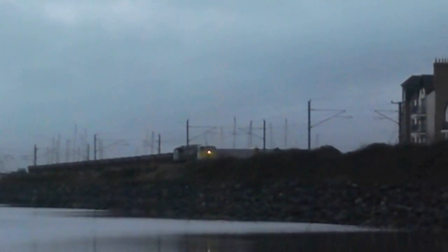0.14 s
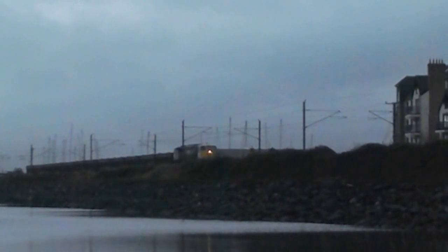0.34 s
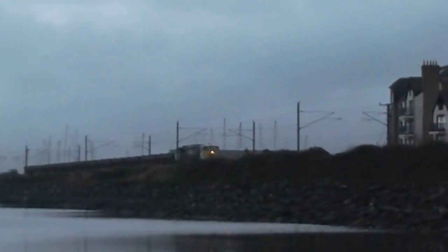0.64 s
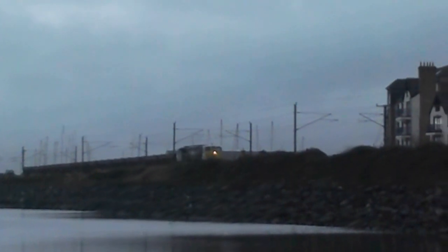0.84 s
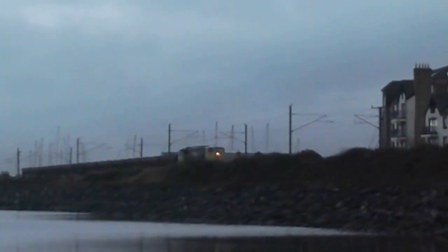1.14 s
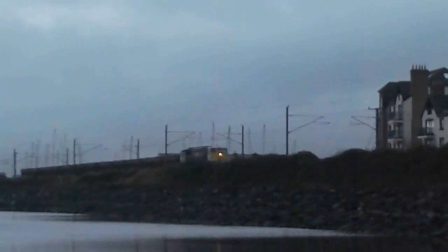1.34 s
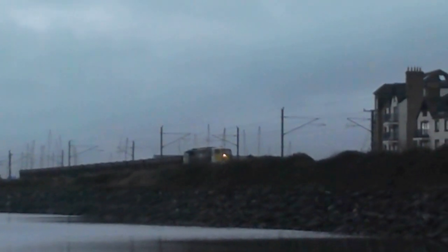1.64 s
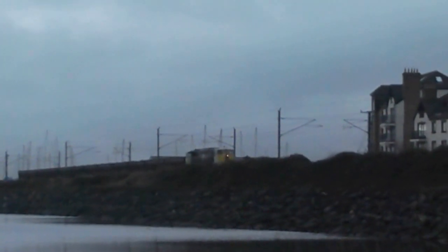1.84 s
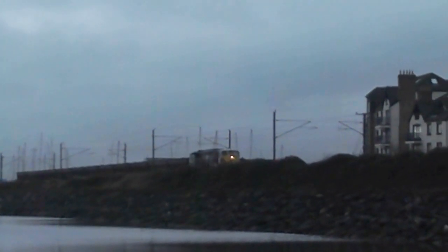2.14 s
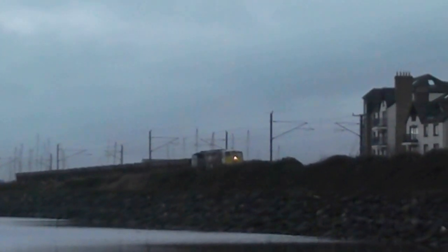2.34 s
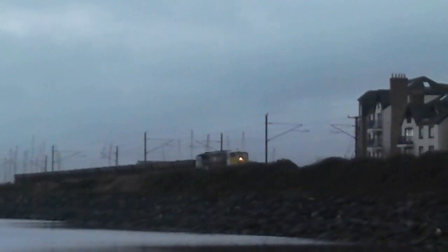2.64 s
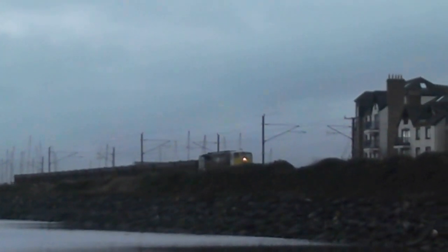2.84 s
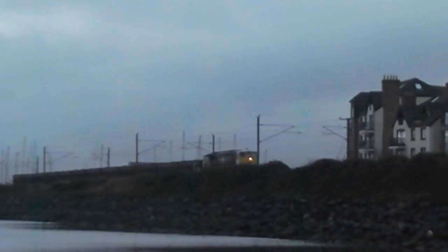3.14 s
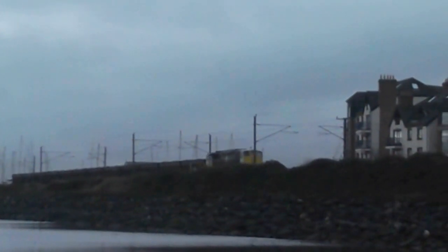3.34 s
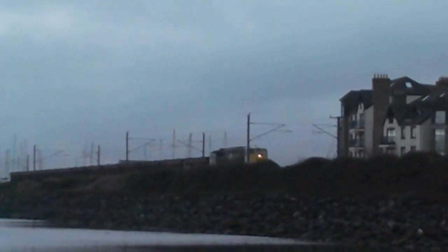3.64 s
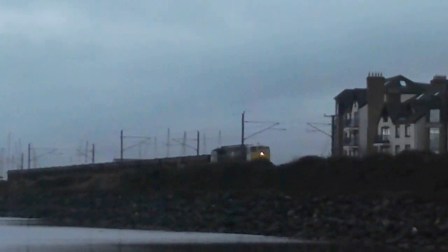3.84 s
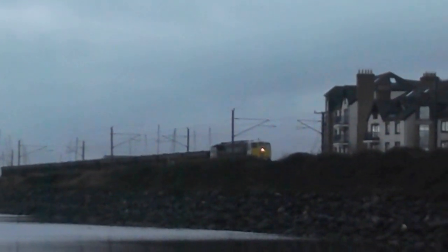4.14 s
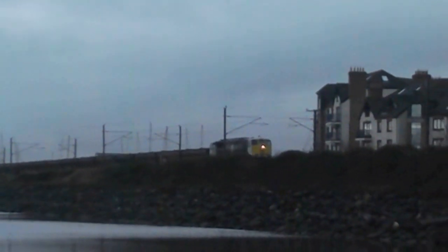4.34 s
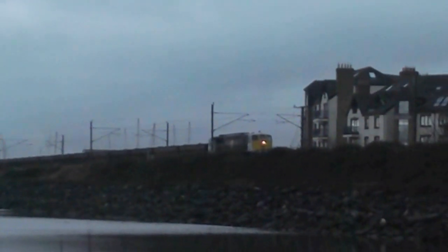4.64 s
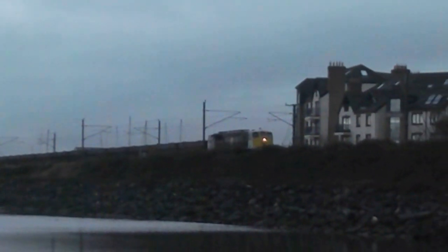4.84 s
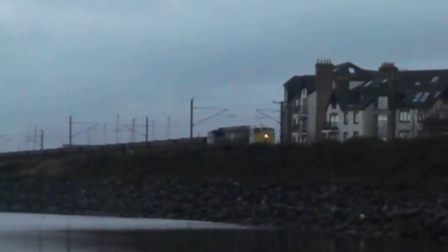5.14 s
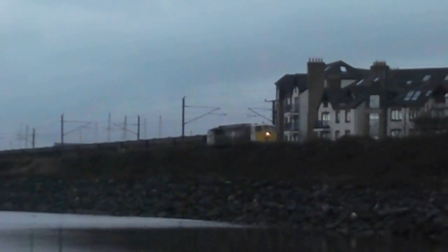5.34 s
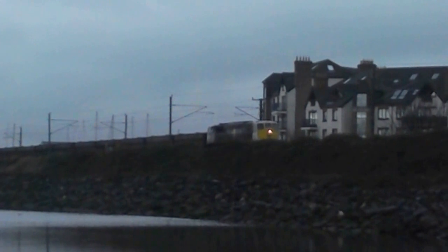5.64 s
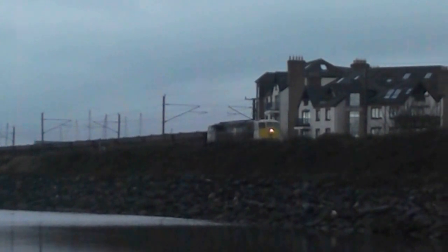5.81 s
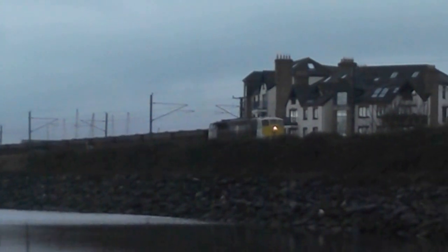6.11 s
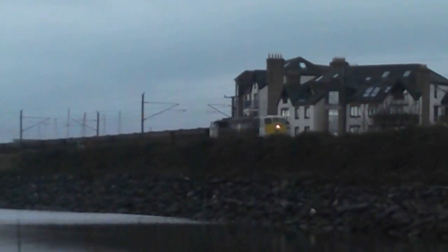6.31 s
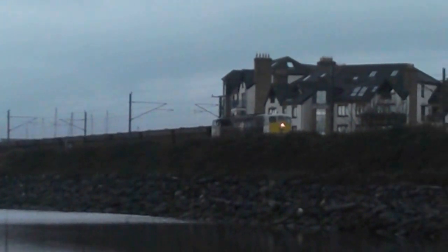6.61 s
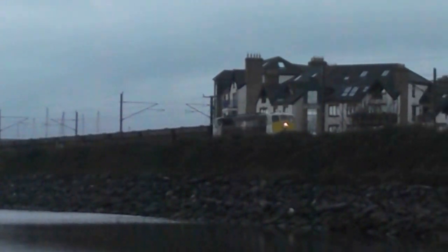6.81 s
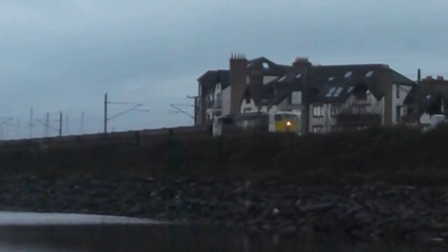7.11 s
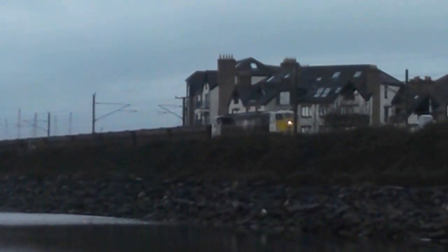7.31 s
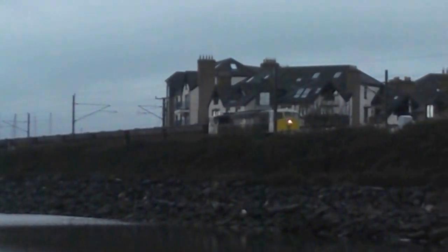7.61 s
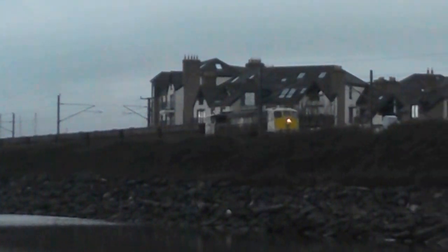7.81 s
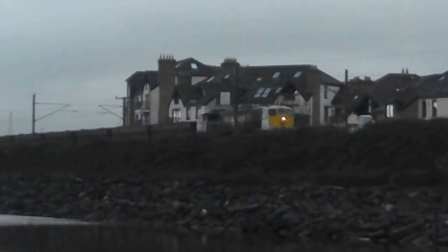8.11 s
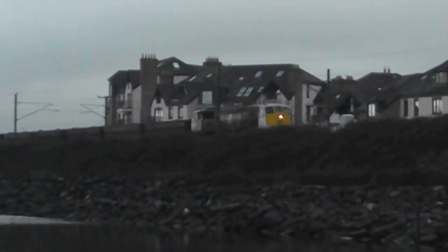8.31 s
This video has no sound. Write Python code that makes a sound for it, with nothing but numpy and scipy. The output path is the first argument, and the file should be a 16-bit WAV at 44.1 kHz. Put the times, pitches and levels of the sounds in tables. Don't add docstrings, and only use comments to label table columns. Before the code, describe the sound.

A diesel locomotive's deep throbbing drone swells as it nears across open shore, with whine, roar, wheel hiss and late overload crackle.

```python
import sys
import numpy as np
from scipy import signal
from scipy.fft import next_fast_len
from scipy.io import wavfile
from scipy.ndimage import uniform_filter1d

SR = 44100
rng = np.random.default_rng(int(sys.argv[2]) if len(sys.argv) > 2 else 0)


def level_to_linear(level):
    exponent = np.asarray(level, float) / 20
    return 10 ** exponent


def store_wav(level_fs):
    pcm = np.round(np.clip(np.atleast_2d(level_fs), -1, 1) * 32767)
    wavfile.write(sys.argv[1], SR, pcm.T.astype(np.int16))


N = 373086


def evened(x):
    return x / np.sqrt(np.mean(x ** 2) + 1e-20)


def curve(rows):
    t_s, value = np.array(rows, float)[:, :2].T
    return np.interp(np.arange(N) / SR, t_s, value)


def bumps(rows):
    t = np.arange(0, N + 256, 256) / SR
    total_db = 0 * t
    for middle_s, half_s, db in rows:
        total_db = total_db + db * np.exp(-((t - middle_s) / half_s) ** 2)
    return np.interp(np.arange(N) / SR, t, total_db)


def bumps_of(rows, item):
    return bumps([row[1:] for row in rows if round(row[0]) == item])


def nearer(share):
    # t/s, level/dB
    near = [(0, -40), (1.2, -38), (2, -38.5), (3.2, -36), (3.9, -32.5), (4.6, -33.5), (5.1, -31),
            (5.6, -33.5), (6.3, -29.5), (7, -27), (7.4, -28), (7.7, -29), (8.1, -26.5), (8.46, -26.5)]
    far_db = -40
    return share * (curve(near) - far_db)


def drift(top_hz, low_hz=0.99):
    t = np.arange(N // 256 + 2) * 256 / SR
    hz = np.geomspace(low_hz, top_hz, num=24)[:, None]
    slow = (np.sin(2 * np.pi * (hz * t + rng.random(hz.shape))) / np.sqrt(hz)).sum(0)
    return np.interp(np.arange(N) / SR, t, evened(slow))


def noise(points, patchy_db, size=1024):
    frames, hz = 4 * N // size + 5, np.fft.rfftfreq(size, 1 / SR)
    a, b, patches = rng.standard_normal((frames, len(hz), 3)).T
    patches = uniform_filter1d(patches, size=10, axis=0)
    patches = evened(uniform_filter1d(patches, size=12, axis=1))
    f, db = np.transpose(points)
    colour_db = np.interp(np.log(hz + 1), np.log(f + 1), db, left=-120, right=-120)
    z = (a + 1j * b) * level_to_linear(colour_db[:, None] + patchy_db * patches)
    return evened(signal.istft(z, nperseg=size, noverlap=3 * size // 4)[1][:N])


def tone(phase, db, flutter_db, wobble_rad, top_hz):
    level = np.sqrt(2) * level_to_linear(db + flutter_db * drift(top_hz))
    return level * np.cos(phase + wobble_rad * drift(top_hz))


def exhaust():
    # t/s, speed/rpm
    crank = [(0, 943.6), (1, 944.42), (3, 944.11), (5, 944.52), (6, 942.42), (7.4, 944.42), (8.46, 938.93)]
    # order, start level/dB, gain/(dB/s), wall echo level/dB
    strong = [(6, -18.5, 0.5949, -36), (7, -27.5, 0.95, -44.5), (8, -17, 0.32, -39),
              (9, -13.5, 0.8762, -36), (10, -18, 0.39, -40.5)]
    # order, level/dB at the start, at 7 s, from 7.8 s on (changing over 7.4-7.8 s)
    weak = [(1, -35.5, -38.5, -41.5), (2, -35.5, -36.5, -37.5), (3, -30, -31.5, -28.5),
            (4, -33, -41, -31.5), (5, -44, -38.5, -40.5), (11, -32, -33, -26), (12, -41, -39, -27.5),
            (13, -48, -43.5, -34.5), (14, -52, -48.5, -37.5), (15, -45.5, -43.5, -40),
            (16, -48, -44.5, -47), (17, -46, -40, -42), (19, -56, -46.5, -45.5), (20, -53, -44.5, -40.5),
            (23, -46, -43, -36.5), (25, -47.5, -45.5, -47), (27, -52.5, -42, -42), (31, -51.5, -47.5, -49)]
    # order, middle/s, half width/s, level/dB
    fades = [(6, 3.4, 1.7, -3.5), (6, 6.2, 0.67, -6.5), (6, 1.3, 0.16, 2.5), (7, 7.2, .45, -11.5),
             (6, 7.35, .12, -8.5), (8, 3.4, 0.66, -3.5), (8, 6.1, 0.45, 0.5), (8, 7.3, .3, -13),
             (9, 3.37, 1.2, -3), (9, 1, 0.28, -2.5), (9, 7.95, .3, 2.5), (9, 2.1, .15, -2), (6, 8.7, .5, 2),
             (8, 8.3, 0.17, 4), (10, 7.9, 0.18, 2), (9, 0.46, 0.19, 2), (9, 7.146, 0.28, -15),
             (9, 8.5, 0.11, -4), (10, 3.98, 1.6, -7.5), (10, 7.3, .35, -12)]
    # order, middle/s, half width/s, level/dB
    fronts = [(6, 4.8, 0.57, 8), (6, 4.7, .6, 2), (8, 3.5, .6, 4), (8, 6.3, 0.77, 7), (9, 2, 0.34, 11),
              (9, 4, 0.95, 12), (9, 6.6, 0.97, 13.5), (10, 6.8, .4, 9.5), (10, 5.2, .3, 6.5)]
    # t/s, loss/(crank turns/s)
    wall = [(0, .093), (1.6, .2715), (2.5, .3655), (3.3, .6086), (4, .5064), (4.6, .7236), (5.6, .72),
            (6.6, .7655), (7.4, .741), (8.46, .82)]
    start_turn, exhaust_lag_rad, bank_lag_rad = .167, 4.2, 1.15
    silencer_lag_rad = 2.3
    angle = 2 * np.pi * (np.cumsum(curve(crank)) / (60 * SR) + start_turn)
    lost = 2 * np.pi * np.cumsum(curve(wall)) / SR

    def phase(k):
        return k * angle - exhaust_lag_rad - bank_lag_rad * (k % 2) - silencer_lag_rad * max(k - 10, 0)

    out = np.zeros(N)
    for order, start_db, gain_db, echo_db in strong:
        k = round(order)
        db = start_db + gain_db * np.arange(N) / SR + bumps_of(fades, k)
        caught_db = echo_db + bumps_of(fronts, k)
        out += tone(phase(k), db, flutter_db=.3, wobble_rad=.08, top_hz=8)
        out += tone(phase(k) - k * lost - np.pi, caught_db, flutter_db=1.5, wobble_rad=.2, top_hz=3)
    for order, start_db, mid_db, near_db in weak:
        db = curve([(0, start_db), (7, mid_db), (7.4, mid_db), (7.8, near_db)])
        out += tone(phase(round(order)), db, flutter_db=1.5, wobble_rad=.3, top_hz=6)
    return out


def whine():
    # far level/dB, share of the nearness
    lines = [(-37, 0.075), (-37.5, 0.058), (-54.5, 1.1), (-53, 1.1)]
    # line, middle/s, half width/s, level/dB
    carries = [(0, 2.6, .2, 5), (0, .7, .2, 3), (0, 1.25, .2, -3), (0, 3.4, .3, 4), (0, 5.6, .9, -4),
               (0, 6.9, .15, -4), (0, 7.2, .25, 5), (1, 1, .2, -4), (1, 1.55, .2, 3), (1, 2.2, .3, 4),
               (1, 5.6, .4, 3), (1, 7, .35, -9), (1, 8.45, .15, -5), (1, 8.15, .12, 5), (2, 4.4, .2, 7),
               (2, 2.8, .4, 2), (2, 3.7, .4, 3), (2, 8.3, .3, -3), (2, 5.6, .4, -4), (2, 7.6, .15, -4),
               (3, 2.4, .5, 4), (3, 4, .3, 3), (3, 7.9, .3, -6), (3, .3, .8, -7), (3, 7, .2, -5),
               (3, 3, .4, 3)]
    hum_hz, mesh_hz = 282.25, 1243.3
    beat_s, beat_low_s, beat_depth = 0.97, 1.81, 0.46
    seconds = np.cumsum(curve([(0, 1), (5.5, 1), (8.46, .998)])) / SR
    beat = abs(1 - beat_depth * np.exp(2j * np.pi * (np.arange(N) / SR - beat_low_s) / beat_s))
    out = np.zeros(N)
    for c, hz in enumerate((hum_hz, 2 * hum_hz, 3 * hum_hz, mesh_hz)):
        far_db, share = lines[c]
        db = far_db + nearer(share) + bumps_of(carries, c)
        line = tone(2 * np.pi * hz * seconds, db, flutter_db=1.2, wobble_rad=.28, top_hz=15)
        out += line * (beat if c == 0 else 1)
    return out + tone(4 * np.pi * mesh_hz * seconds, db - 17, flutter_db=2.5, wobble_rad=.9, top_hz=15)


def roar():
    # f/Hz, level/dB
    low_colour = [(170, -35.5), (200, 2.5), (300, 0), (400, -5), (500, -1), (600, -1), (750, -7.5),
                  (1000, -23)]
    high_colour = [(550, -29.5), (750, -0.5), (950, 3), (1150, 2), (1260, 0), (1320, -19), (1700, -18.5),
                   (2000, -34)]
    low_db = -34.5 + nearer(0.29) + bumps([(1.9, .6, 1), (8.2, .5, 4.1)])
    high_db = -42.0 + nearer(1.13)
    low = level_to_linear(low_db) * noise(low_colour, patchy_db=-0.7, size=2048)
    return low + level_to_linear(high_db) * noise(high_colour, patchy_db=0.5)


def wheels():
    # f/Hz, level/dB
    roll_colour = [(760, -28.5), (1300, -5), (1320, -2.5), (1420, -3.5), (1830, -4.5), (2150, -13.5),
                   (2800, -44), (4730, -120)]
    ring_colour = [(1260, -36), (2150, -7), (2450, 2), (2530, -1), (2730, -8.5), (3160, -4.5),
                   (3550, -14.5), (3800, -24.5), (4940, -44.5), (8360, -120)]
    hiss_colour = [(2180, -35), (3700, -3.5), (4430, -1), (5740, -3.5), (6440, -5), (8000, -20.5),
                   (10400, -42.5), (17600, -120)]
    # middle/s, half width/s, level/dB
    swells = [(.3, 0.07, 4), (1.3, .3, 3), (2.3, .25, 2), (3.9, 0.14, 1.5), (4.62, 0.13, 4), (5.1, .2, 0),
              (6.05, .1, 4), (7.45, 0.24, 4.5)]
    # middle/s, half width/s, level/dB
    ringing = [(1, 0.39, 2.5), (3.1, 0.5, -1), (6.75, 0.14, 2), (7.35, .25, 0.5), (8.3, 0.25, -1.5)]
    swell_db, gust_db = .5 * drift(30, low_hz=4), bumps(swells)
    roll_db = -42.0 + nearer(0.35) + 0.19 * gust_db + swell_db
    ring_db = -48.5 + nearer(0.79) + .75 * gust_db + bumps(ringing) + swell_db
    hiss_db = -58.0 + nearer(0.92) + 1.2 * gust_db + swell_db
    roll = level_to_linear(roll_db) * noise(roll_colour, patchy_db=0.0)
    ring = level_to_linear(ring_db) * noise(ring_colour, patchy_db=0.5)
    return roll + ring + level_to_linear(hiss_db) * noise(hiss_colour, patchy_db=1.0)


def shore():
    # f/Hz, level/dB
    rumble_colour = [(12, -11), (22, -6), (33, -8), (45, -5), (60, -7), (75, -9), (110, -10), (140, -7),
                     (165, -13), (200, -28)]
    # middle/s, half width/s, level/dB
    gusts = [(.8, 0.46, 2), (2.14, 0.22, 3.5), (5.5, 0.54, 4.5), (6.9, .9, 5.5), (8.5, .15, 5)]
    # t/s, f/Hz, level/dB, length/s
    one_drip = (3.242, 3850, -46, .007)
    drip_s, hz, db, long_s = one_drip
    t = np.arange(N) / SR - drip_s
    drip = level_to_linear(db) * np.exp(-(t / long_s) ** 2) * np.sin(2 * np.pi * hz * t)
    return level_to_linear(bumps(gusts) - 26) * noise(rumble_colour, patchy_db=2.8, size=8192) + drip


def limited(x, knee_db, firm):
    envelope = abs(signal.hilbert(x, next_fast_len(N))[:N])
    level_db = 20 * np.log10(envelope + 1e-6)
    over_db = np.maximum(uniform_filter1d(level_db, size=120) - knee_db, 0)
    return x * level_to_linear(-np.clip(firm, 0, 1) * uniform_filter1d(over_db, size=60))


def glitches(x, step_db):
    # t/s, crests in a row, level/dB
    early = [(1.3854, 2, -35), (4.2449, 2, -33), (4.256, 1, -33), (4.6303, 2, -35), (4.6897, 2, -33),
             (4.8841, 3, -33), (5.071, 1, -34), (5.0782, 1, -34), (5.643, 2, -35), (6.2866, 1, -35),
             (6.2934, 1, -40), (6.4069, 5, -34), (6.5417, 2, -35), (6.7589, 1, -35), (6.7658, 1, -39),
             (6.8864, 2, -31)]
    crest_s = .0035
    overload_s, overload_height = 7.61, .5
    turn_s, heavy_share = .0637, .68
    jumps = np.zeros(N + 200)
    for s, run, db in early:
        at = np.round((s + crest_s * np.arange(run)) * SR).astype(int)
        jumps[at] = np.sign(x[at]) * level_to_linear(step_db + db + 31.5)
    smooth = abs(uniform_filter1d(x, size=60))
    crests = signal.find_peaks(smooth, height=overload_height, distance=90)[0]
    luck = rng.random((N // 64 + 1, 5))
    for k in crests[crests > overload_s * SR] - 15:
        size, back, wait, chatter, stray = luck[k // 64]
        heavy = (k / SR - overload_s) / turn_s % 1 < heavy_share
        happens = stray < (.78 if heavy else .15)
        height = np.sign(x[k]) * level_to_linear(step_db - .5 - 7 * size) * happens
        teeth = round(2 + 4 * wait) if chatter < .17 else 1
        jumps[k:k + 10 * teeth:10] += height * .8 ** (teeth > 1)
        jumps[k + 10 * teeth + round(40 * wait)] -= height * (back < .35)
    return signal.lfilter([1], [1, -.6], jumps)[:N]


def scene():
    return (exhaust() + whine() + roar() + wheels() + shore())[None]


def low_pass(x):
    return signal.sosfilt(signal.butter(12, 15710, fs=SR, output="sos"), x)


def record(dry):
    # f/Hz, level/dB
    pilots = [(11316, -83), (11359, -88), (11402, -86)]
    # f/Hz, level/dB
    self_colour = [(5000, -30), (7000, 0), (8700, 0), (10000, -1), (11500, -1), (13000, -3), (15800, -5.5)]
    pilot = sum(level_to_linear(db) * np.sin(2 * np.pi * hz * np.arange(N) / SR) for hz, db in pilots)
    x = limited(dry[0], knee_db=-1.1, firm=.8)
    x = x + glitches(dry[0], step_db=-19.5)
    x = x + level_to_linear(-66.5) * noise(self_colour, patchy_db=.3) + pilot
    x = x * np.minimum(np.arange(N) / (.004 * SR), 1)
    return low_pass(np.clip(x, -1.02, 1.02)[None])


dry = scene()
out = record(dry)
store_wav(out)
```